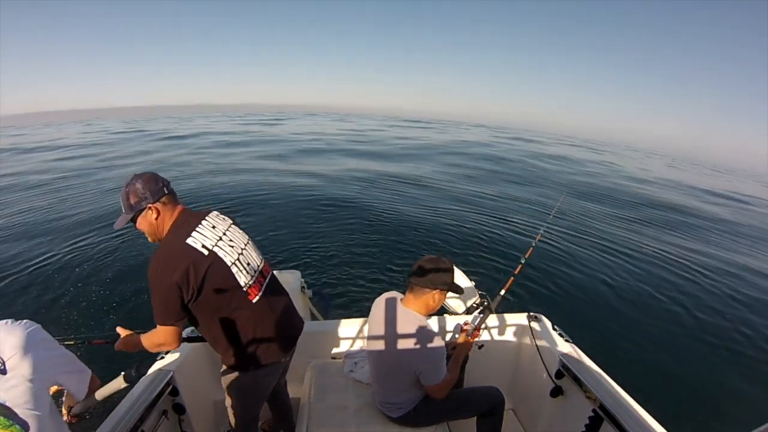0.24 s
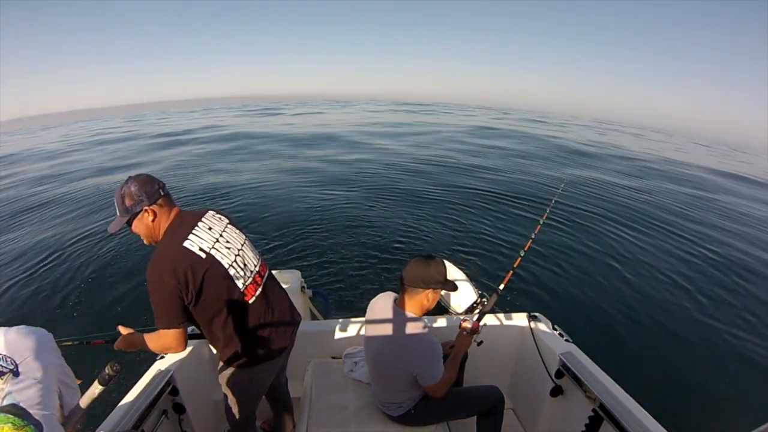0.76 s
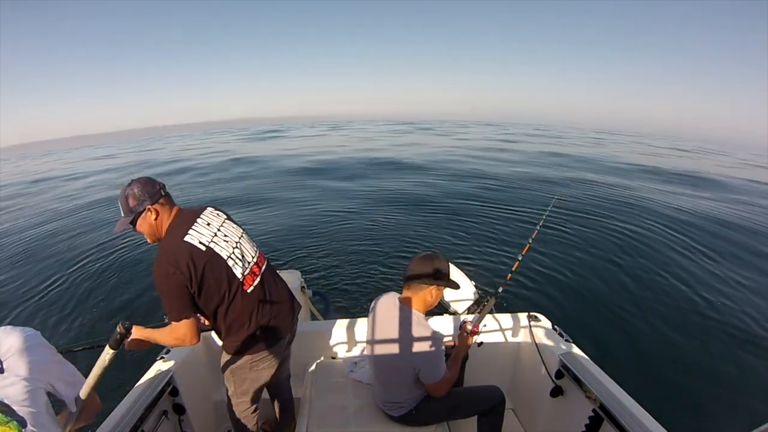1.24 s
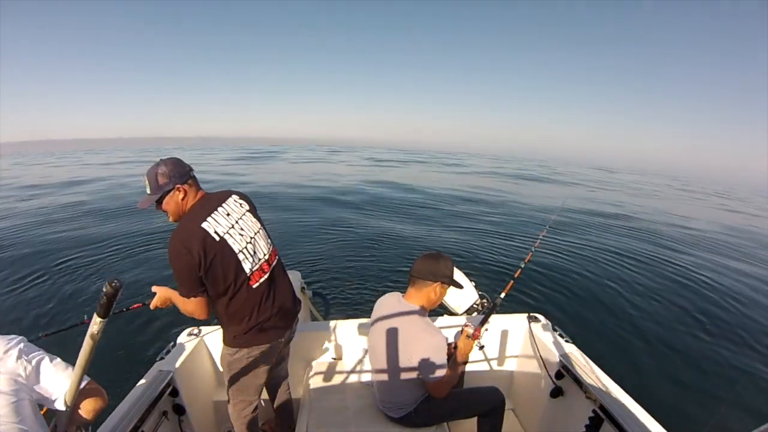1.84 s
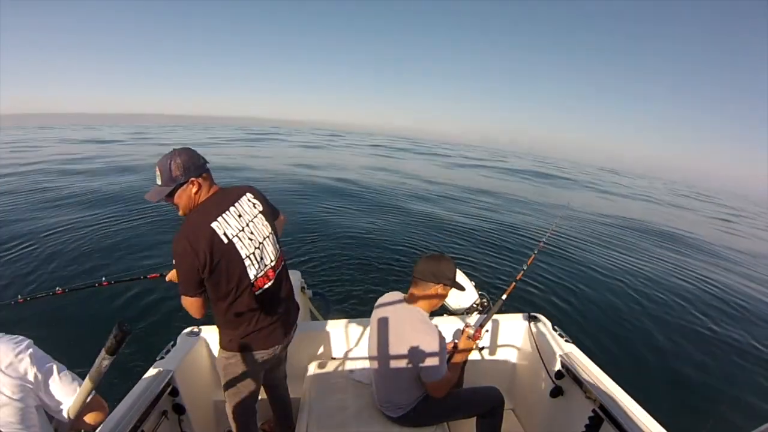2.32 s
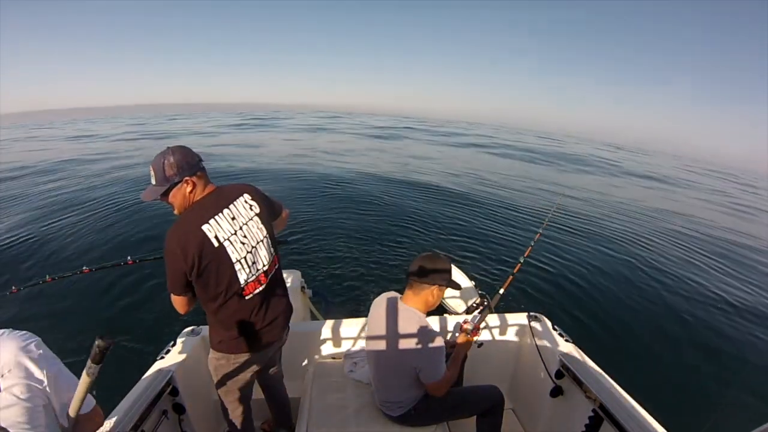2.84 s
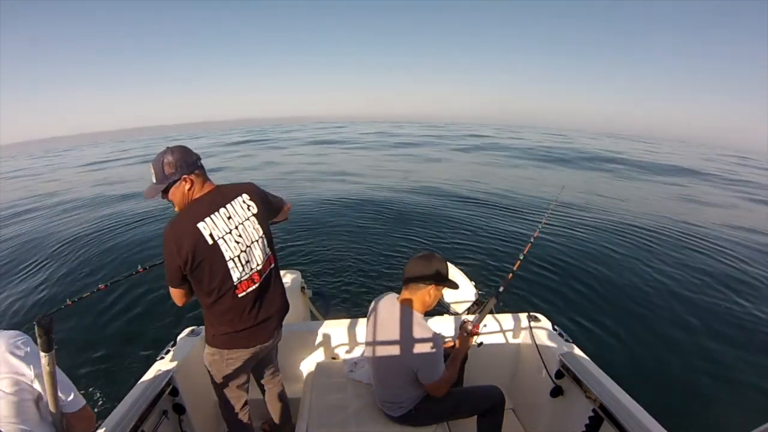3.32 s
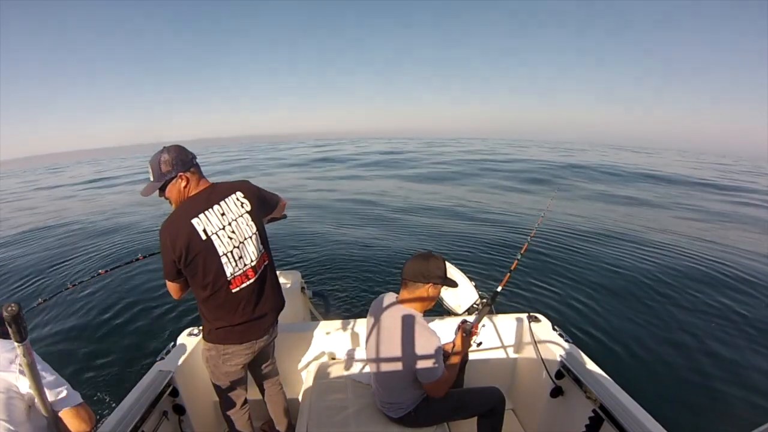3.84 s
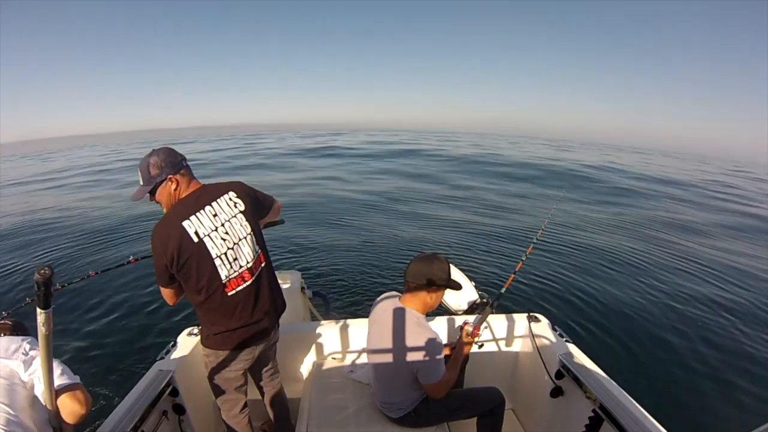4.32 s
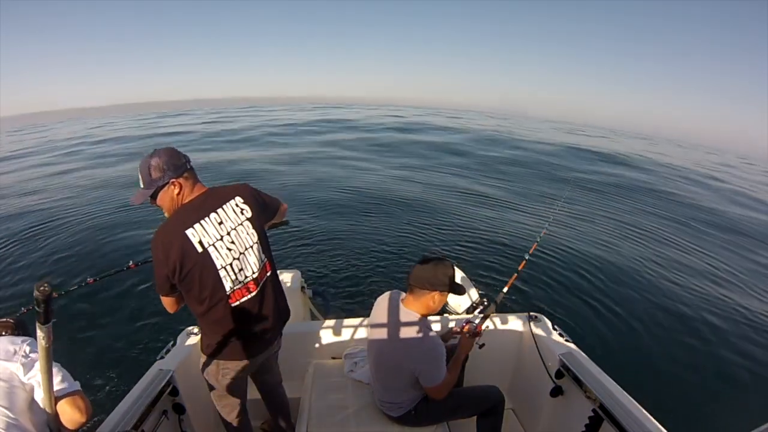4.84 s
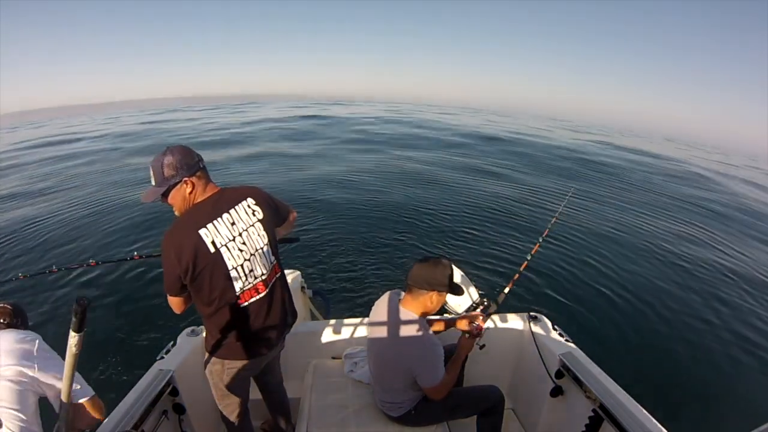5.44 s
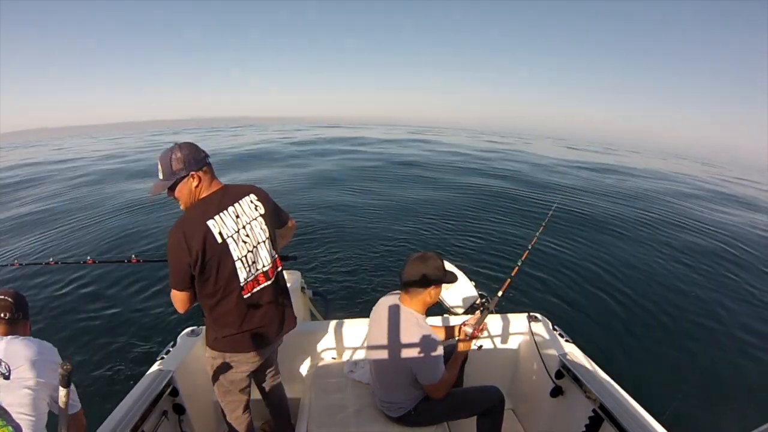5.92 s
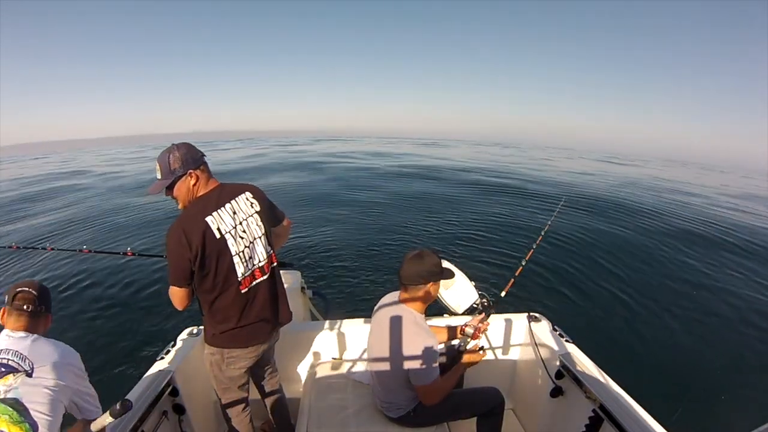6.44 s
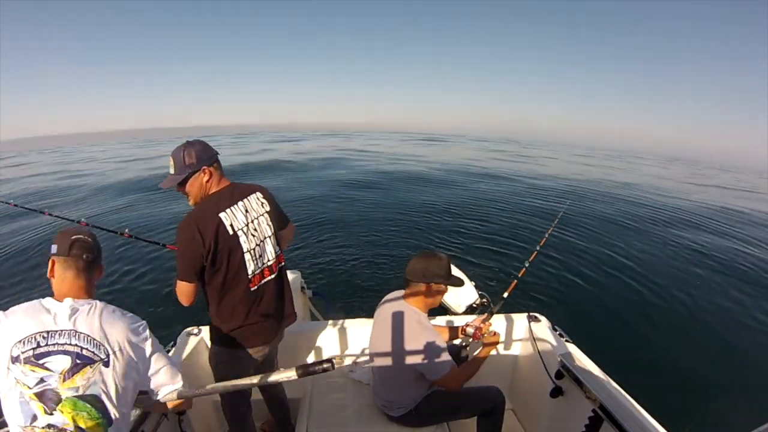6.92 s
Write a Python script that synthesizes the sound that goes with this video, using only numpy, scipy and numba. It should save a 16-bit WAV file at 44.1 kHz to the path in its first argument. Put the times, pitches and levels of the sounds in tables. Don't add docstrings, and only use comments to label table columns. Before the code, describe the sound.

Close on the deck of a small boat, heard through a sealed, muffled microphone, a heavy engine idles with a wavering low boom, panel buzz and soft exhaust hiss. Tackle clicks and scrapes with watery gulps come first, then scattered loose knocks, a rattling run mid-way and another later. Sharp metallic cracks and a close bump arrive towards the end, over a faint open-sea background.

```python
import sys
import numpy as np
from scipy import signal
from scipy.fft import rfft, irfft
from scipy.io import wavfile
from scipy.ndimage import uniform_filter1d
from numba import njit

SR = 44100
rng = np.random.default_rng(int(sys.argv[2]) if len(sys.argv) > 2 else 0)


def bounce(signal):
    frames = np.transpose(np.atleast_2d(signal))
    limited = np.clip(frames, -1, 1)
    pcm = np.round(limited * 32767).astype(np.int16)
    wavfile.write(sys.argv[1], SR, pcm)


def volts_from_db(level):
    exponent = np.asarray(level, float) / 20
    return 10 ** exponent


N = 316197


def unit(x):
    return x / np.sqrt(np.mean(x ** 2))


def curve(table):
    s, value = np.transpose(table)
    return np.interp(np.arange(N) / SR, s, value)


def swells(events):
    t = np.arange(N) / SR
    return sum(db * np.exp(-2 * ((t - s) / half) ** 2) for s, db, half in events)


def walk(rate):
    hold = int(SR / rate)
    levels = np.repeat(np.clip(rng.standard_normal(N // hold + 1), -2, 2), hold)
    return 1.44 * uniform_filter1d(uniform_filter1d(levels, hold), hold)[:N]


@njit
def svf(x, hz, width):
    y, b, l = np.empty(len(x)), 0., 0.
    g, k = np.tan(np.pi * hz / SR), width / hz
    for i in range(len(x)):
        v = (b + g * (x[i] - l)) / (1 + g * (g + k))
        b, l, y[i] = 2 * v - b, l + 2 * g * v, k * v
    return y


def steep_band(x, hz, width):
    return svf(svf(x, hz, width), hz, width)


def resonances(modes, source, flicker_db, rate):
    out = np.zeros(N)
    for hz, width, db in modes:
        ring = unit(steep_band(source(), hz, 1.95 * width)) * np.sqrt(width)
        out += volts_from_db(db + flicker_db * walk(rate)) * ring
    return unit(out)


def add(out, s, sound):
    i = int(s * SR)
    out[i:i + len(sound)] += sound[:N - i]


def tone(phase):
    return np.sqrt(2) * np.sin(phase)


# start_s, firing_rate_hz
IDLE = [(0.0, 45.74), (.31, 46.24), (.82, 46.87), (1.18, 45.61), (1.66, 44.65), (1.85, 45.67),
        (2.09, 47.16), (2.74, 44.55), (3.12, 45.75), (3.52, 47.43), (3.96, 45.87), (4.45, 46.8),
        (4.97, 44.48), (5.48, 44.93), (5.88, 47.27), (6.28, 46.88), (6.61, 45.25), (6.94, 46.64)]
CYLINDERS = [1.3, 2.2, 1.8, 3.4, 2.7, 1.6]


def engine():
    hz = curve(IDLE)
    cycles = np.cumsum(hz) / SR
    sag_hz = 47.4 - hz
    count = cycles.astype(int)
    chance_db = 1.4 * np.clip(rng.standard_normal(N // 500), -2, 2)
    strength = volts_from_db(np.array(CYLINDERS)[count % 6] + chance_db[count])
    pulses = unit(strength * (np.diff(count, prepend=0) > 0))
    puff = 1 + 0.78 * strength * np.exp(-(cycles % 1) / 1.5)
    return (boom(cycles, sag_hz) + hull(pulses) + bulkhead(cycles, hz, sag_hz, pulses)
            + rocking(cycles) + panels_and_exhaust(puff, sag_hz))


# start_s, level_db
LOAD = [(0.0, -34), (.3, -27), (.76, -23), (1.22, -24), (1.48, -26.5), (1.73, -27.5), (1.98, -21.5),
        (2.72, -28), (3.0, -25), (3.6, -24), (3.96, -25.5), (4.42, -26), (5.0, -31.5), (5.44, -24),
        (5.93, -24), (6.2, -27.5), (6.66, -31), (7.0, -21)]
# centre_s, depth_db, half_width_s
STUMBLES = [(0.12, -5, 0.05), (.24, -1.5, .04), (1.32, -3, 0.027), (1.69, -19, 0.052), (1.88, -22, 0.057),
            (2.0, -7, 0.1), (2.18, -9, 0.072), (2.33, -9, 0.062), (2.5, -4, 0.032), (2.89, -14, 0.032),
            (3.07, -2.5, 0.035), (3.47, -1, .06), (3.85, -4.5, 0.054), (4.17, -7, 0.25), (4.71, -5, 0.042),
            (5.11, -14, 0.054), (6.63, -3, 0.045), (6.79, 0.5, .04), (6.95, -7, 0.044), (7.17, -5.5, 0.096)]
# centre_s, rise_db, half_width_s
THROBS = [(.05, 9, 0.14), (.18, 7, 0.06), (.4, 14, 0.32), (.78, 17, 0.083), (1.12, 6, 0.15),
          (1.32, 3, 0.036), (1.58, 11, 0.2), (1.8, 10, 0.032), (2.03, 8, 0.17), (2.7, 10, 0.34),
          (3.07, 13, 0.11), (3.27, 11, 0.058), (3.47, 23, 0.041), (3.75, 10, 0.076), (3.93, 12, 0.13),
          (4.67, 9.5, 0.14), (4.85, 7.5, 0.14), (5.1, 7.5, 0.17), (5.35, 10.5, 0.1), (5.7, 12, 0.079),
          (5.92, 10, 0.15), (6.45, 12.5, 0.26), (6.75, 7, 0.023), (6.9, 7, 0.05), (7.03, 18, 0.088)]


def boom(cycles, sag_hz):
    wobble = 0.3 * walk(8)
    boom_db = curve(LOAD) + swells(STUMBLES) + 1.6 * walk(13)
    overtone_db = -50.5 + sag_hz + swells(THROBS) + walk(13)
    first = -tone(2 * np.pi * cycles + wobble + np.pi / 2)
    octave = tone(4 * np.pi * cycles + wobble + 0.6 * walk(4))
    return volts_from_db(boom_db) * first + volts_from_db(overtone_db) * octave


# pitch_hz, width_hz, level_db
HULL = [(39.5, 18, -16.5), (66.6, 11, 2.5), (75.2, 15.5, -1), (103.6, 13.2, -3), (119.7, 16.4, -7.5),
        (140.6, 6.5, -5.5)]


def hull(pulses):
    return volts_from_db(-39) * resonances(HULL, lambda: pulses + 1.42 * rng.standard_normal(N), flicker_db=2.5, rate=5)


# pitch_hz, width_hz, level_db
BULKHEAD = [(164.4, 11.4, -2), (178.44, 6.2, -1.5)]
# centre_s, rise_db, half_width_s
RINGS = [(.02, 4.5, 0.15), (.62, 7.5, 0.14), (.9, 9, 0.13), (1.12, 9, 0.13), (1.38, 10, 0.13),
         (1.75, 9, 0.46), (2.1, 1, 0.35), (2.35, 1, 0.13), (2.85, 12, 0.34), (3.3, 9.5, 0.12),
         (3.85, 12.5, 0.073), (4.05, 7.5, 0.073), (4.7, 5.5, 0.065), (5.1, 10, 0.4), (5.85, 10, 0.39),
         (6.72, 9, 0.17)]


def bulkhead(cycles, hz, sag_hz, pulses):
    rings_db = swells(RINGS)
    detuning_db = -6 * ((4 * hz - 179) / 7) ** 2
    fourth = volts_from_db(-57 + rings_db + detuning_db) * tone(8 * np.pi * cycles + 0.8 * walk(4))
    rough = resonances(BULKHEAD, lambda: 0.17 * pulses + rng.standard_normal(N), flicker_db=2.5, rate=4.05)
    return fourth + volts_from_db(-52.5 - 0.5 * sag_hz + rings_db) * rough


# centre_s, rise_db, half_width_s
ROCKS = [
    (.55, 19, 0.17),
    (1.3, 14, 0.54),
    (2.2, 8, 0.23),
    (2.9, 16, .2),
    (3.6, 2, 0.18),
    (4.45, 9, 0.16),
    (5.4, 10, 0.27),
    (6.2, 7, 0.27),
    (6.93, 19, 0.13),
]


def rocking(cycles):
    return volts_from_db(-53 + swells(ROCKS)) * tone(2 * np.pi * 1.42 * cycles + 1.03 * walk(3.7))


# pitch_hz, width_hz, level_db
DECK = [(343.6, 52, -3), (414, 56, -5.5), (456.5, 25.5, -4), (482.8, 18.3, 2), (588, 80, -4),
        (681, 38.6, -1), (763.3, 13.2, 4.5), (830, 23, 2), (853, 53, -1), (983, 83, -5), (1071, 117, -8.5),
        (1350, 330, -16)]
# pitch_hz, width_hz, level_db
CASE = [(2280, 660, 2.5), (2642, 95, 4.5), (3920, 730, 0.5), (6090, 850, -1), (7860, 2440, -8.5),
        (12100, 5300, -13.5)]
# centre_s, rise_db, half_width_s
SHUDDERS = [
    (.1, 3.5, 0.93),
    (.75, 2.5, 0.29),
    (2.8, 2.6, 0.38),
    (3.42, 1, 0.069),
    (3.8, 2.5, 0.22),
    (5.15, 2, 0.45),
    (5.9, 2.5, 0.52),
    (6.7, 1.5, 0.28),
    (7.16, 2, 0.034),
]


def panels_and_exhaust(puff, sag_hz):
    def source():
        return puff * rng.standard_normal(N)

    shudder_db = swells(SHUDDERS)
    stir_db = 3 / (1 + np.exp((np.arange(N) / SR - 1) / 0.23))
    deck = resonances(DECK, source, flicker_db=1.5, rate=7)
    hiss = resonances(CASE, source, flicker_db=0.7, rate=12)
    deck_db = -47.5 + 0.17 * sag_hz + shudder_db
    hiss_db = -61.5 - 0.07 * sag_hz + 0.66 * shudder_db + stir_db
    return volts_from_db(deck_db) * deck + volts_from_db(hiss_db) * hiss


# pitch_hz, level_db, t60_s
FITTING = [(700, -1, .034), (880, -1, .018), (1050, -2, .02)]
# start_s, peak_db
KNOCKS = [(1.055, -36), (1.45, -40), (2.519, -35), (2.564, -37), (2.587, -34), (2.675, -35), (2.697, -33),
          (2.741, -33), (2.764, -33), (2.786, -36), (2.809, -35), (2.833, -30), (2.855, -32), (2.878, -30),
          (2.945, -35), (2.965, -36), (3.649, -38), (3.877, -36), (4.039, -36), (4.272, -39), (4.91, -34),
          (4.954, -32), (5.019, -34), (5.042, -35), (5.065, -37), (5.089, -33), (5.111, -35), (5.134, -36),
          (5.157, -32), (5.18, -37), (5.204, -33), (5.226, -33), (5.247, -34), (5.271, -32), (5.293, -34),
          (5.314, -33), (5.425, -36), (5.446, -35), (6.035, -38), (6.308, -35), (6.565, -36)]


def fitting():
    out, t = np.zeros(N), np.arange(int(0.05 * SR)) / SR
    for s, db in KNOCKS:
        tune = 1 + 0.025 * rng.standard_normal(4)
        dull = np.zeros(len(t))
        for (hz, mode_db, t60), detune, side in zip(FITTING, tune, (1, -1, 1)):
            dull += side * volts_from_db(mode_db) * np.sin(2 * np.pi * hz * detune * t) * 1000. ** (-t / t60)
        tick = np.sin(2 * np.pi * 2300 * tune[3] * t) * 1000. ** (-t / 0.028)
        tick *= volts_from_db(-17 + 1.2 * rng.standard_normal())
        level = volts_from_db(db + 0.3)
        add(out, s - 0.0006, level * (1 - np.exp(-(t / 0.0012) ** 2)) * dull)
        add(out, s - 0.0025, level * (1 - np.exp(-(t / 0.001) ** 2)) * tick)
    return out


# start_s, peak_db, ring_hz, low_part_db, ring_share (0-1)
CLICKS = [(0.0344, -61, 3930, -9, 0.4), (0.063, -46, 4300, -7, 0.75), (0.163, -48, 3840, -1, 0.1),
          (0.171, -33, 4170, 11.5, 0.62), (0.3312, -51, 4200, -13, 0.36), (0.7135, -47, 3680, -5, 0.8),
          (0.995, -56, 3570, -13, 0.3), (2.849, -52, 4170, -15, 0.9), (2.885, -49.5, 4150, -15, 0.94),
          (5.5287, -35, 7830, 6, 0.7), (5.5502, -24, 6050, -18, 0.63), (5.6194, -57, 3510, -10, 0.3),
          (5.7397, -47, 6000, -16, 0.86), (6.6862, -54, 7400, -23, 0.85), (6.6944, -34, 8300, 8, 0.73),
          (6.8094, -59, 4110, -7, 0.4), (6.892, -51, 6500, -5, 0.57), (6.9596, -57, 3860, -21, 0.2),
          (7.029, -54, 3530, -12, 0.4), (7.131, -34.5, 3730, 8, 0.86)]
# pitch_hz, width_hz, level_db
LATCH = [(2440, 110, 6), (3600, 1450, -4), (6050, 280, 0), (7160, 300, 3), (8200, 680, -4),
         (11200, 440, -4)]


def clicks():
    out, t = np.zeros(N), np.arange(int(0.1 * SR)) / SR
    for s, db, hz, low_db, share in CLICKS:
        bounce_s = 0.00396 / rng.uniform(0.68, 1.25)
        bounces = 1 + 0.5 * np.cos(2 * np.pi * t / bounce_s)
        decay = 1000. ** (-t / 0.05) + 0.5 * np.exp(-t / 0.0007)
        crack = rng.standard_normal(len(t)) * bounces * decay
        body = steep_band(crack * (1 - np.exp(-t / 0.0026)), 2900, 1400)
        parts = sum(volts_from_db(part_db) * svf(crack, part_hz, width) for part_hz, width, part_db in LATCH)
        rattle = 0.81 * steep_band(crack, 5300, 8400) + 3.23 * parts
        ring = 2.7 * svf(crack, hz, 380)
        high = (1 - np.clip(share, 0, 1)) * rattle + share * ring
        add(out, s + 0.001007, volts_from_db(db) * (high + volts_from_db(low_db - 4) * body))
    return out


# start_s, length_s, level_db, centre_hz, width_hz
SCRAPES = [(0.029, 0.095, -52, 830, 400), (0.103, 0.057, -52, 4000, 4940), (0.109, 0.024, -45, 900, 500),
           (.165, 0.013, -38.5, 875, 500), (.22, 0.087, -60, 5000, 6000), (0.422, 0.023, -53, 4500, 6000),
           (0.418, 0.03, -43, 560, 600), (.42, .03, -44, 950, 700), (0.534, 0.066, -43.5, 4200, 1300),
           (.548, .005, -39, 4100, 900), (.557, .008, -40, 4300, 900), (.564, .012, -35.5, 4600, 400),
           (.569, .008, -38, 4200, 700), (.576, .018, -43, 4000, 1100), (0.532, 0.074, -48, 7400, 4000),
           (0.535, 0.025, -51, 2300, 900), (.558, .018, -48, 2300, 1100), (.576, .018, -49, 2300, 1300),
           (5.529, 0.0083, -48, 4000, 1800), (5.533, .006, -43, 2400, 400), (5.556, .007, -44, 2400, 500),
           (5.5508, .0045, -43, 11300, 1500), (5.5508, .0045, -40, 8800, 1800),
           (6.695, .008, -47, 3100, 900), (6.695, .007, -48, 4600, 1200), (6.699, .006, -47, 2500, 500),
           (6.704, .012, -53, 3000, 1500), (7.13, 0.006, -35, 820, 300), (7.138, 0.02, -40, 950, 600),
           (7.1305, .014, -46, 1600, 900), (7.134, .03, -42, 420, 300), (7.13, 0.018, -47, 3900, 900),
           (7.1305, 0.014, -47, 5600, 2500), (7.142, .028, -56, 4000, 4000)]


def scrapes():
    out = np.zeros(N)
    for s, length, db, hz, width in SCRAPES:
        n = int(length * SR)
        grain_db = 2.2 * np.repeat(rng.standard_normal(n // 120 + 1), 120)[:n]
        grit = rng.standard_normal(n) * volts_from_db(grain_db)
        add(out, s, volts_from_db(db) * np.hanning(n) ** 0.5 * unit(steep_band(grit, hz, 1.1 * width)))
    return out


# pitch_hz, width_hz, level_db
WELL = [(216, 23.4, -1.5), (257, 28, 3), (301.5, 30.5, -3.5)]
# centre_s, rise_db, half_width_s
SLOPS = [(.07, 0, 0.12), (.68, 4.5, 0.11), (1.06, 6, 0.07), (1.27, 5, 0.078), (1.54, 5, 0.064),
         (2.19, 5, 0.1), (2.62, 10, 0.03), (2.87, 8, 0.056), (3.35, 4, 0.2), (3.83, 6.5, 0.1),
         (4.07, 4, 0.07), (5.15, 3, 0.074), (6.15, 7, 0.082), (6.71, 3.5, 0.041), (6.97, 5, 0.068),
         (7.17, 5, 0.074)]


def wash():
    return volts_from_db(-50.5 + swells(SLOPS)) * resonances(WELL, lambda: rng.standard_normal(N), flicker_db=0.5, rate=9.1)


# start_s, level_db, start_hz, rise
# (relative), t60_s
GULPS = [(.052, -21, 200, .5, .05), (.063, -25, 420, .3, .04), (.081, -21.5, 330, .9, .05),
         (.11, -28, 480, .6, .045), (.424, -33, 570, .2, .07), (.75, -32, 370, 1.1, .12),
         (.605, -34, 400, .3, .06), (.71, -36, 480, 1.2, .08), (.825, -33, 220, .5, .1),
         (.16, -37, 1170, .2, .04), (2.59, -33, 225, .1, .12), (6.13, -34, 260, .1, .12),
         (7.13, -31, 1150, 2.7, .045)]


def gulps():
    out, t = np.zeros(N), np.arange(int(0.12 * SR)) / SR
    for s, db, hz, rise, t60 in GULPS:
        bubble = np.sin(2 * np.pi * hz * (t + rise * t ** 2 / t60))
        add(out, s, volts_from_db(db) * (1 - np.exp(-t / 0.003)) * 1000. ** (-t / t60) * bubble)
    return out


# pitch_hz, level_db (per Hz)
AIR = [(13, -14), (22, -6), (64, -7), (226, -24.5), (475, -28), (545, -22.5), (845, -34), (1720, -54),
       (2670, -49.5), (5160, -61), (7380, -51), (11800, -70), (15500, -61)]


def sea():
    hz, db = np.transpose(AIR)
    f = np.arange(N // 2 + 1) * SR / N + 1
    shape = volts_from_db(np.interp(np.log(f), np.log(hz), db))
    floor = unit(irfft(rfft(rng.standard_normal(N)) * shape, N))
    return volts_from_db(-40.5 + 0.16 * walk(3.34)) * floor


def scene():
    return (engine() + fitting() + clicks() + scrapes() + wash() + gulps() + sea())[None]


def roll_off(x):
    return signal.sosfilt(signal.butter(12, 15620, fs=SR, output="sos"), x)


def record(dry):
    wet = dry[0] - 0.4 * svf(dry[0], 5200, 520)
    wet = wet - 0.7 * svf(wet, 552, 45)
    return roll_off(wet)


dry = scene()
out = record(dry)
bounce(out)
```